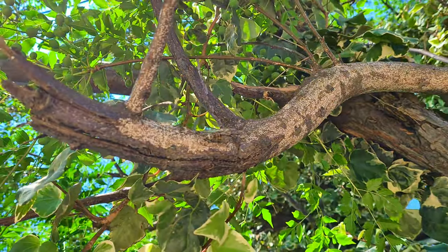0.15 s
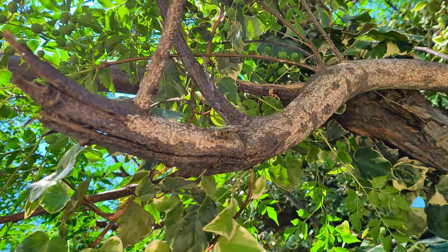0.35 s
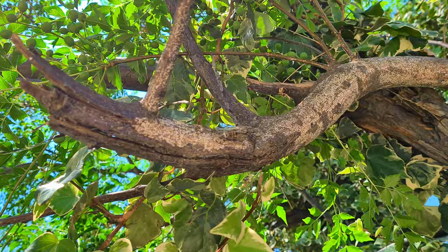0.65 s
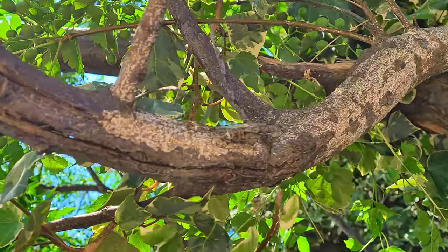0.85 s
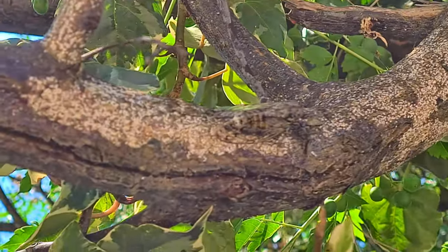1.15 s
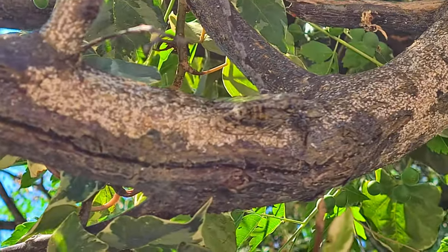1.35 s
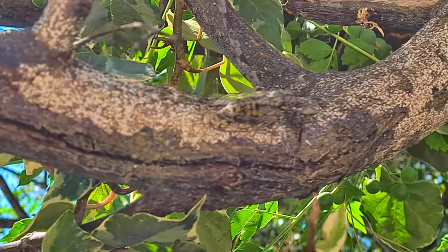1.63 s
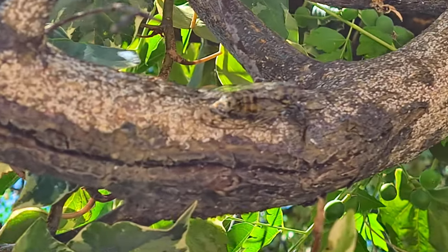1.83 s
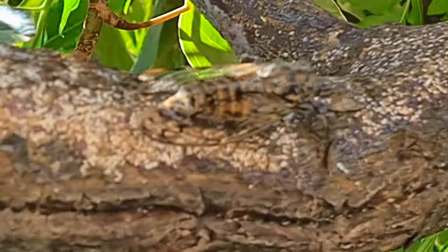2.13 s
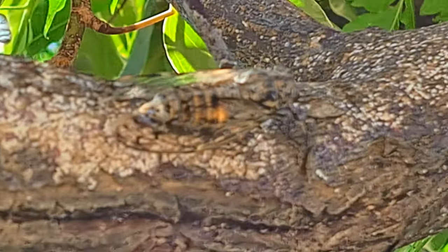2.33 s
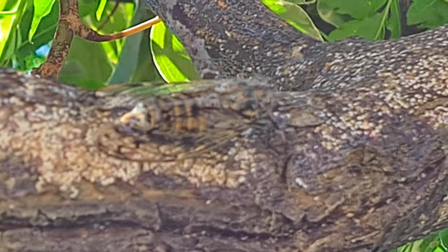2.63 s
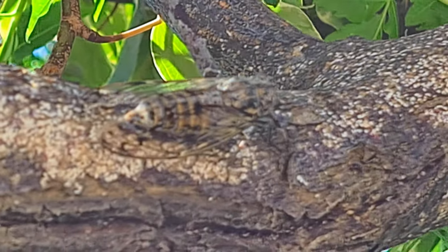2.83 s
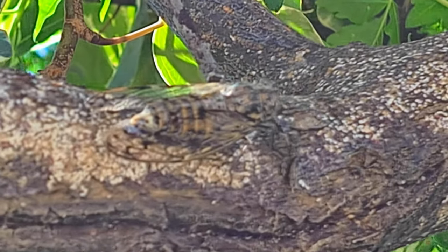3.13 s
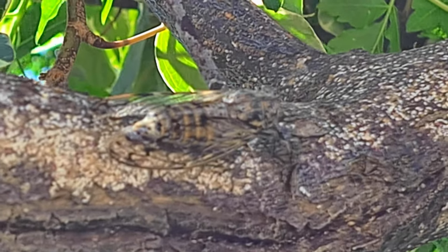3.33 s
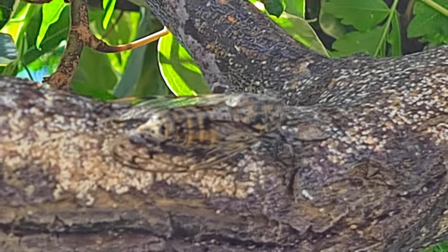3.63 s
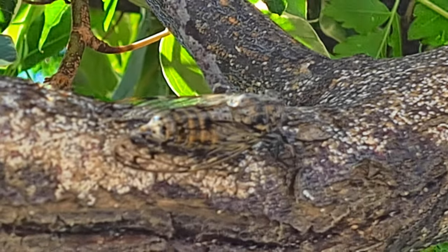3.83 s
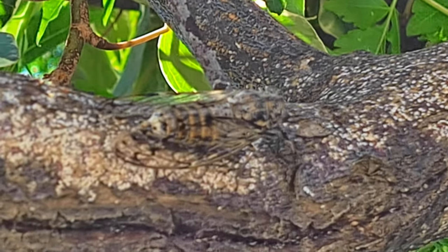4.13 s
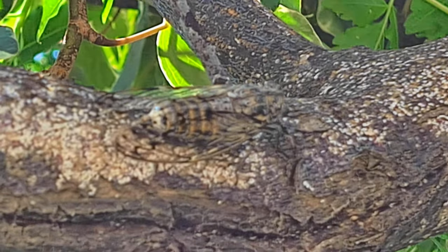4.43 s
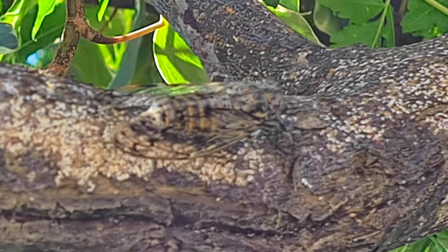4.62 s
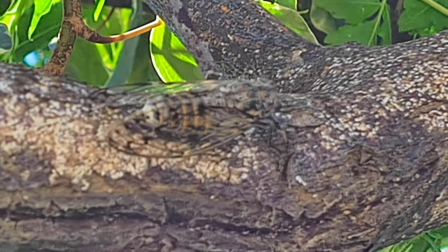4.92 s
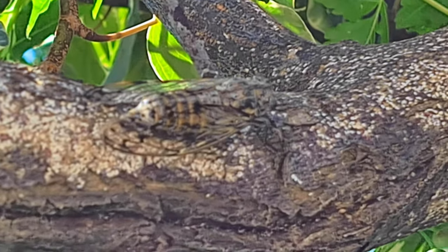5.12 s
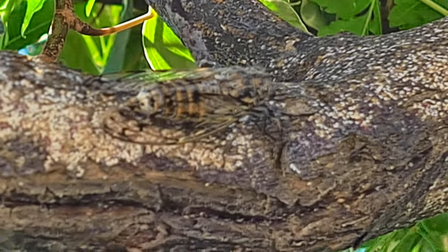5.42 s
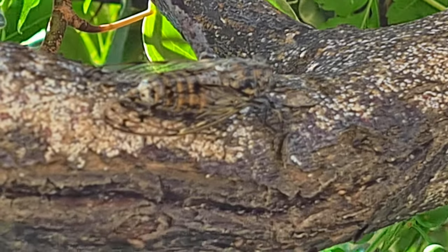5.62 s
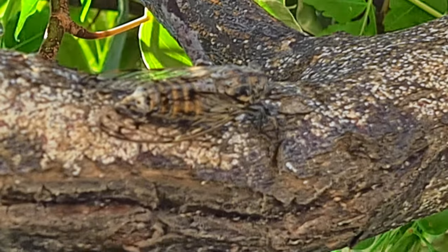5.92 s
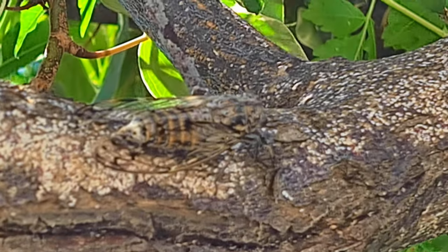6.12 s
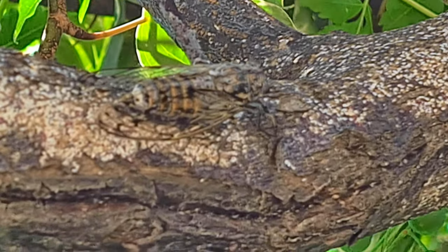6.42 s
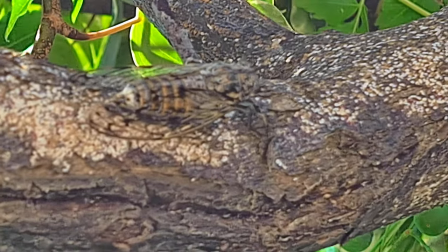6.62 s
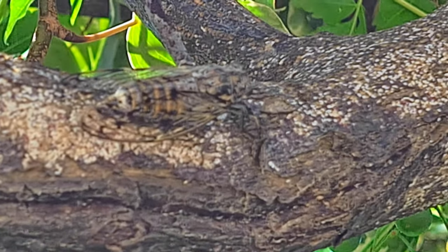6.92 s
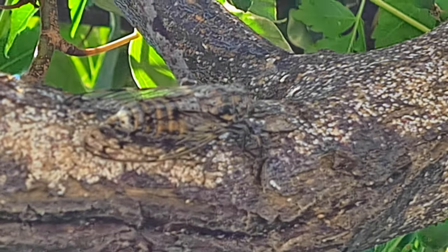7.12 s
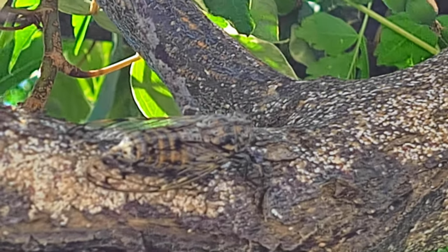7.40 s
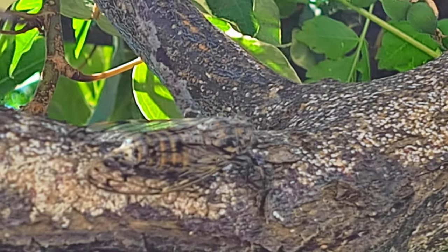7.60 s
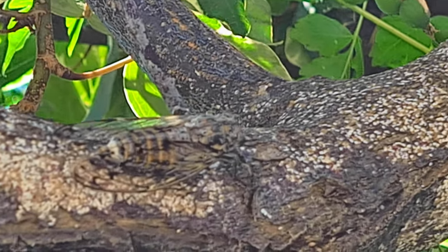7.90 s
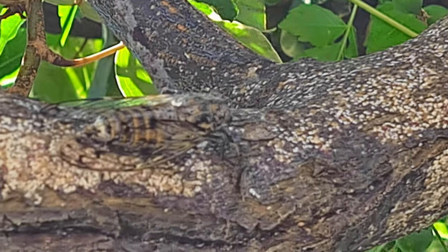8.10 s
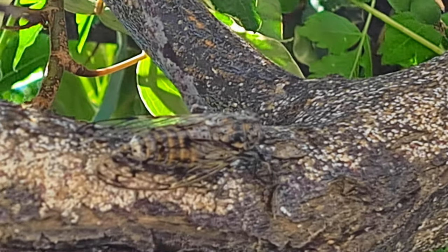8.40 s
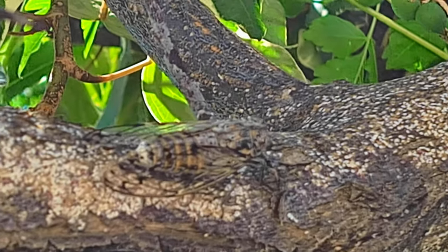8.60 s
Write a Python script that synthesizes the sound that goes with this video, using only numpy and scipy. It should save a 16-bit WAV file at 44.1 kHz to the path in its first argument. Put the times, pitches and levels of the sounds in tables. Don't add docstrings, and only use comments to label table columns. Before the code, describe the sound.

From 0 s a cicada close by chirps in short, harsh, high buzzes of about 0.06 s, repeating three or four times a second with slightly uneven gaps. Each is a tight rattle of clicks that swells quickly and stops sharply. A weaker, slightly longer and duller chirp from a neighbour falls in some of the gaps. A constant, fine high hiss of distant cicadas and a low, wavering traffic rumble lie underneath; the tyre noise thins after about 1 s and is faint by 5 s. Small finger knocks touch the phone near 0.5, 0.7 and 1.7 s, the last clearly left, with fainter ones around 3 and 6 s. From 3 to 6 s the near song is strongest and leans left, with stuttered starts near 4.75 and 5.5 s. From 6.3 s it is softer and more central, rising slightly before ending mid-song near 8.7 s.

```python
import sys
import numpy as np
from scipy import signal
from scipy.fft import rfft, irfft, next_fast_len
from scipy.io import wavfile
from scipy.ndimage import uniform_filter1d

SR = 44100
rng = np.random.default_rng(int(sys.argv[2]) if len(sys.argv) > 2 else 0)


def makeup_ratio(level_db):
    decades = np.asarray(level_db, float) / 20
    return 10 ** decades


def transcribe(signal):
    frames = np.atleast_2d(signal).T
    limited = np.clip(frames, -1, 1)
    pcm = np.round(limited * 32767).astype(np.int16)
    wavfile.write(sys.argv[1], SR, pcm)


N = 385875

# [click rate f/Hz, level/dB, 1 = early rib]
RIBS = [(2950, -8, 1), (2860, -3, 1), (2780, -2, 1), (2700, -6, 1), (2370, -7, 0), (2260, -2, 0),
        (2250, 0, 0), (2260, -1, 0), (2300, -5, 0), (2460, -8, 0), (2480, -11, 0)]
FRONT_LAG_S, SIDE_LAG_S = .000083, .00048


def colour(x, hz, db):
    size = next_fast_len(N)
    grid = np.log(np.arange(size // 2 + 1) * SR / size + 1)
    gain = makeup_ratio(np.interp(grid, np.log(hz), db))
    return irfft(rfft(x, size) * gain, size)[..., :N]


def unit(x):
    return x / np.sqrt(np.mean(x ** 2))


def clicks(times, sizes):
    place = np.ravel(times) * SR
    near = np.floor(place)[:, None] + np.arange(-7, 9)
    away = near - place[:, None]
    shape = np.ravel(sizes)[:, None] * np.sinc(away) * np.cos(np.pi * away / 16) ** 2
    index = np.clip(near, 0, N - 1).astype(int)
    return np.bincount(index.ravel(), shape.ravel(), N)


def walk(rate):
    k = int(SR / rate)
    steps = np.repeat(rng.standard_normal(N // k + 1), k)
    return 1.26 * uniform_filter1d(uniform_filter1d(steps, k), k)[:N]


def scatter(x, t60_s):
    t = np.arange(SR // 2) / SR
    decay = 1000. ** (-t / t60_s) * (t > .001)
    cloud = rng.standard_normal((2, len(t))) * decay
    cloud /= np.sqrt(np.sum(cloud ** 2) / 2)
    return signal.fftconvolve(x, cloud, axes=1)[:, :N]


def chorus():
    # [f/Hz, level/dB per Hz]
    chorus_spectrum = [(1000, -50), (1700, -39), (2010, -4), (2170, -10.5), (2470, -11), (3100, -11.5),
                       (3530, -14.5), (4110, 2.5), (4510, -1.5), (5140, -0.5), (6750, -4.5), (8140, -17.5),
                       (11300, -18.5), (14300, -26.5), (16000, -30)]
    rate_hz = np.transpose(RIBS)[0]
    chance = rng.random((6000, 3))
    times = chance[:, :1] * N / SR + np.cumsum(1 / rate_hz) / (.95 + 0.078 * chance[:, 1:2])
    swell = np.hanning(len(RIBS) + 2)[1:-1]
    swarm = clicks(times, makeup_ratio(8 * chance[:, 2:]) * swell)
    blur = unit(scatter(swarm[None], t60_s=0.15)) + 1.33 * rng.standard_normal((2, N))
    level_db = -41.0 + 0.69 * walk(2.5) + np.array([[.8], [-.8]])
    return unit(colour(blur, *np.transpose(chorus_spectrum))) * makeup_ratio(level_db)


def traffic():
    # [f/Hz, level/dB per Hz]
    road_spectrum = [(12, -33), (20, -19), (48, -3.5), (70, 2), (95, -4), (151, -15), (318, -22),
                     (390, -21), (790, -27.5), (874, -32), (1740, -32.5), (2130, -37.5), (2500, -40.5),
                     (3250, -36), (5500, -120)]
    # [t/s, level/dB]
    engines = [(0.0, -31), (0.05, -34), (1.05, -35), (1.07, -47), (1.32, -36), (1.66, -43), (2.66, -34.5),
               (3.17, -44), (3.24, -32.5), (3.36, -38.5), (4.9, -33), (5.02, -40), (5.09, -34.5),
               (6.99, -45), (8.07, -33.5), (8.75, -44.5)]
    # [t/s, level/dB]
    narrowing = [
        (0.9, -0.5),
        (1.3, -3),
        (2.7, -4.5),
        (5.2, -14),
        (7.3, -14),
        (8.6, -18),
    ]
    t = np.arange(N) / SR
    narrow_db = np.interp(t, *np.transpose(narrowing))
    engine_db = np.interp(t, *np.transpose(engines)) + 3
    hz, db = np.transpose(road_spectrum)
    lag = int(1.063 * SIDE_LAG_S * SR)
    out = 0
    for low, high, like, flicker_db, level_db in ((10, 172, 0.27, 2.5, engine_db),
                                                  (145.5, 880, 0.78, 2.1, -36.5 + narrow_db),
                                                  (780, 2770, 0.65, 1.7, -43.5 + 0.96 * narrow_db)):
        shared, own = rng.standard_normal((2, N))
        right = like * np.roll(shared, lag) + np.sqrt(1 - like ** 2) * own
        sos = signal.butter(2, [low, high], "bandpass", fs=SR, output="sos")
        band = unit(signal.sosfilt(sos, colour(np.array([shared, right]), hz, db)))
        out = out + band * makeup_ratio(level_db + flicker_db * walk(11))
    return out


def cicada(chirps, pitch, pace, lag_s, sharpen_db):
    # [f/Hz, left level/dB, right level/dB]
    sac = [(1600, -37, -39), (2200, -22, -14), (2600, -20, -19), (2950, -10, -11), (3250, -9, -11),
           (3600, -23, -22), (4450, -1, .5), (5000, -2, -3), (5550, 1, 4), (6050, -7, -7), (6750, -1, -7),
           (7500, 0, -5), (8200, -19, -19), (9000, -40, -40)]
    # [f/Hz, left level/dB, right level/dB]
    crack = [(7000, -40, -40), (8000, -22, -19), (8800, -21, -11), (9900, -24, -16), (10600, -19, -11),
             (11800, -18, -14), (12800, -14, -20), (13400, -22, -25), (14000, -21, -18), (15400, -27, -25),
             (15900, -55, -55)]
    first_gaps_s, steady_gap_s = [.0072, .0056], .0049
    tighten = 0.034
    rate_hz, rib_db, early = np.transpose(RIBS)
    ripple = np.cumsum(1 / rate_hz) - .0027
    rows = []
    for first, last, first_db, last_db, early_db, pan_db in chirps:
        chance = rng.standard_normal((32, 2, len(RIBS) + 1))
        steady = max(round(((last - first) / pace - sum(first_gaps_s)) / steady_gap_s), 0)
        count = steady + 3 if steady else 1
        at = np.cumsum([0] + first_gaps_s + [steady_gap_s] * steady)[:count]
        grown = at / max(at[-1], steady_gap_s)
        turn = (-1) ** np.arange(count)
        jitter_s = .0002 * turn + .0002 * chance[:count, 0, 0]
        start = first + grown * (last - first) + jitter_s * (grown > 0)
        stray = .012 * chance[:count, 1, :1] + .006 * turn[:, None] + .007 * chance[-1, 0, 0]
        tension = pitch * (1 + tighten * (grown[:, None] - .5) + stray)
        times = start[:, None] + ripple / tension + .000008 * chance[:count, 0, 1:]
        swell_db = first_db + grown * (last_db - first_db)
        db = swell_db[:, None] + rib_db + 1.2 * chance[:count, 1, 1:]
        hard_db = sharpen_db * (grown - 1)[:, None] + 0 * db
        rows.append([np.ravel(v) for v in (times, db, hard_db, 0 * db + early * early_db, 0 * db + pan_db)])
    times, db, hard_db, early_db, pan_db = np.hstack(rows)
    out = np.zeros((2, N))
    for port, (side, shade) in enumerate(((0.96, 2.4), (-1.05, 1.6))):
        size = makeup_ratio(db + shade * early_db + side * pan_db / 2)
        late, sign = rng.random(len(times)), rng.choice((-1, 1), len(times))
        both_times = np.r_[times - side * lag_s / 2, times + .004 * late]
        for table, gain, stray_db in ((sac, 1, -11.5), (crack, makeup_ratio(hard_db - 4.5), -2)):
            hz, *port_db = np.transpose(table)
            sizes = np.r_[size * gain, size * gain * sign * makeup_ratio(stray_db)]
            out[port] += colour(clicks(both_times, sizes), hz * pitch, port_db[port])
    return out


def near_chirps():
    # [first buckling t/s, length/s, final level/dB]
    singer = [(0.0265, .0717, -6), (0.4226, .0635, -3.5), (0.6803, .0587, -1.5), (0.9149, .0541, -2.5),
              (1.2759, .0618, -3.5), (1.6345, .0717, -2.5), (1.8776, .0528, -3), (2.2846, .0652, -4),
              (2.6541, .0662, -2), (2.9177, .0554, -0.5), (3.3022, .0651, 0), (3.5749, .0667, 0),
              (3.8183, .0566, -1), (4.0558, .0561, -1), (4.4635, .0669, -1), (5.0309, .067, -1),
              (5.2661, .0616, -0.5), (5.7169, .0573, -1), (5.9299, .0623, -1), (6.2944, .0754, -7.5),
              (6.702, .0779, -4), (6.9917, .0635, -6), (7.2419, .0704, -6), (7.5084, .0638, -6),
              (7.7319, .0561, -6), (7.9539, .0558, -5), (8.1794, .0504, -5.5), (8.4127, .0589, -5),
              (8.6225, .0589, -3.5)]
    # [lone t/s, lone level/dB, restart t/s, length/s, final level/dB]
    stumbles = [
        (4.7537, -6.5, 4.7802, .0554, -2.5),
        (5.4912, -4.5, 5.5064, .0473, -1),
    ]
    # [t/s, how far the left port faces the singer 0-1]
    facing = [(0.0, -.1), (0.45, .1), (0.7, .45), (1.3, .15), (1.9, .55), (2.5, .45), (2.92, 1.0),
              (4.8, .8), (5.3, .95), (5.95, .85), (6.3, -.3), (6.7, .2), (7.75, -.05), (8.2, .35),
              (8.65, .7)]
    restarts = [row[2:] for row in stumbles]
    lone = [(s, 0, db) for s, db, *_ in stumbles]
    start, length, db = np.transpose(singer + restarts + lone)
    aim = np.interp(start, *np.transpose(facing))
    first_db = db - 54 * length
    early_db, pan_db = 1.47 - 6 * aim, 3.5 * aim
    return np.transpose([start, start + length, first_db, db, early_db, pan_db])


def near_tint(song):
    # [f/Hz, level/dB]
    tint = [
        (1900, 5.5),
        (2200, 2),
        (2550, -3),
        (3000, 1),
        (4500, 0.5),
        (6000, 2.5),
        (7100, -2),
        (8800, 1),
    ]
    return colour(song, *np.transpose(tint))


def far_chirps():
    # [start t/s, final level/dB]
    neighbour = [(.22, -16.5), (1.075, -17.5), (1.46, -16.5), (1.66, -19.5), (2.06, -17.5), (2.45, -18.5),
                 (3.08, -25), (3.36, -24), (4.27, -21), (4.67, -19.5), (4.84, -21), (5.54, -28), (6.1, -19),
                 (6.491, -19.5), (6.89, -21), (7.08, -22), (7.68, -23), (8.34, -22)]
    length_s, swell_db, early_db, pan_db = .108, 3.5, -2.5, .3
    return [(s, s + length_s, db - swell_db, db, early_db, pan_db) for s, db in neighbour]


def trunk_shade(song):
    return colour(song, [4600, 6500, 9000], [0, -5, -3])


def taps():
    # [t/s, peak level/dB, start pitch f/Hz, left minus right level/dB]
    finger_taps = [
        (0.502, -38.5, 2020, 0.0),
        (0.68, -40, 1965, -1.0),
        (1.683, -34, 1970, 16.5),
        (1.776, -42, 1950, 4),
        (3.008, -48, 2070, -7),
        (4.512, -62, 2020, 0.5),
        (5.935, -52, 1940, 0.5),
        (6.007, -40, 1970, -8),
    ]
    out, t = np.zeros((2, N + 800)), np.arange(800) / SR
    for s, db, hz, pan_db in finger_taps:
        phase = 2 * np.pi * (400 * t + hz * 0.00065 * (1 - np.exp(-t / 0.00059)))
        knock = np.sin(phase) * np.exp(-t / 0.0021)
        port_db = db + 11 + np.array([[pan_db], [-pan_db]]) / 2
        i = int(s * SR)
        out[:, i:i + len(t)] += makeup_ratio(port_db) * knock
    nail = clicks([1.7768], [makeup_ratio(-23)])
    return out[:, :N] + nail


def scene():
    near = cicada(near_chirps(), pitch=.978, pace=.97, lag_s=FRONT_LAG_S, sharpen_db=8.0)
    near = near_tint(makeup_ratio(13.0) * near)
    far = cicada(far_chirps(), pitch=.99, pace=1.18, lag_s=SIDE_LAG_S, sharpen_db=4)
    far = trunk_shade(makeup_ratio(8) * far)
    songs = near + far
    twigs = makeup_ratio(-15) * scatter(songs, t60_s=.02)
    crown = makeup_ratio(-11.5) * scatter(songs, t60_s=0.097)
    return songs + twigs + crown + chorus() + traffic() + taps()


def top_cut(x):
    return signal.sosfilt(signal.butter(12, 16460, fs=SR, output="sos"), x)


def record(dry):
    low_pass = signal.ellip(8, .2, 60, 15850, fs=SR, output="sos")
    mix = signal.sosfilt(low_pass, np.tanh(dry))
    return top_cut(mix)


dry = scene()
out = record(dry)
transcribe(out)
```